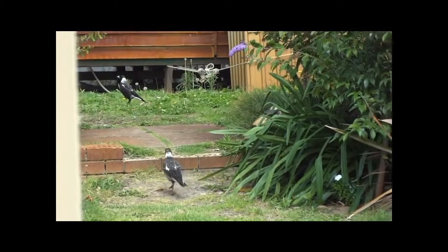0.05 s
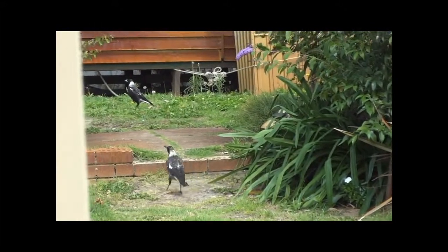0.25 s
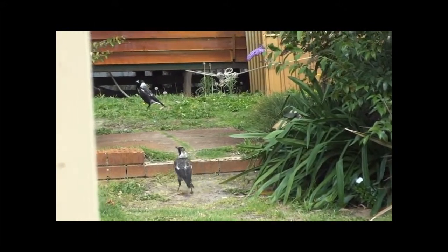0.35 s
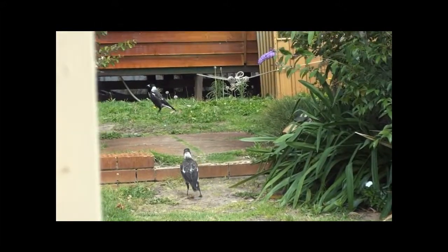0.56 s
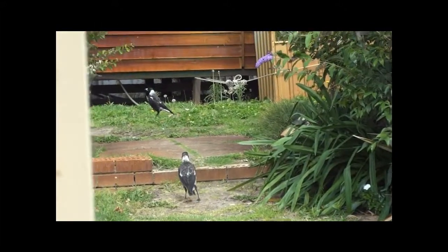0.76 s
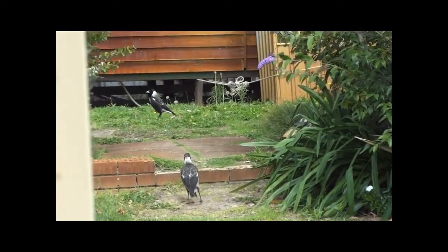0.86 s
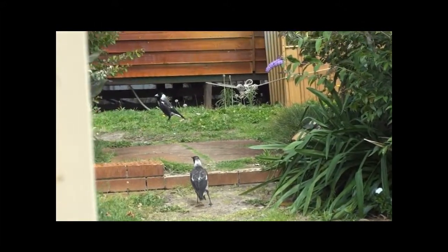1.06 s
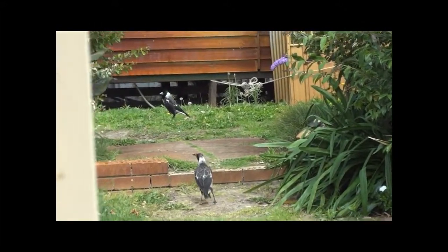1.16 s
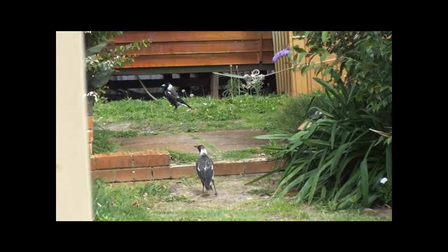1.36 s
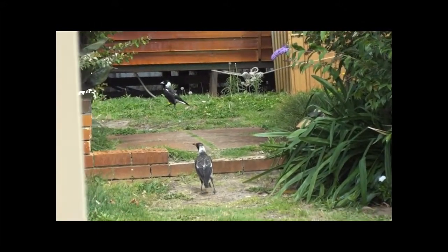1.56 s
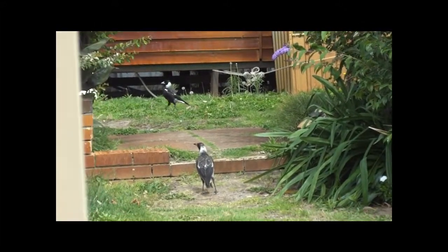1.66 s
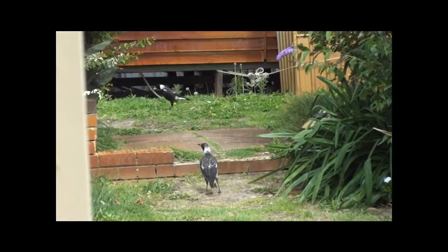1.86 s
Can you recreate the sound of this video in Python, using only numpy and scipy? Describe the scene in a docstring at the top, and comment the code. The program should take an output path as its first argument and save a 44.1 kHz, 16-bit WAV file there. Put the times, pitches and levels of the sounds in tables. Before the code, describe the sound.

Short burst of upswept bird pips echoing lightly between fences, with a soft distant engine throb beneath.

```python
"""Quick whistles in a backyard

A small bird pipes six quick rising whistles: harmonic sines with narrow breath noise on a pitch sweep.
Walls and fences throw them back as single echoes, with dense scatter and a decaying tail of taps.
Traffic washes below as shaped noise, and low tones beat as an engine far off.
Leaves tick in short bright noise bursts; another bird whistles faintly in gliding narrow noise."""
import sys
import numpy as np
from scipy import signal
from scipy.fft import rfft, irfft
from scipy.io import wavfile
from scipy.ndimage import uniform_filter1d

SR = 44100
rng = np.random.default_rng(int(sys.argv[2]) if len(sys.argv) > 2 else 0)


def how_loud(loudness_db):
    """Turn decibels into a plain amplitude multiplier (0 dB gives 1, 20 dB gives 10)."""
    steps = np.asarray(loudness_db, float) / 20
    return 10 ** steps


def generate_wav(sig):
    """Save sig (samples, or channels by samples) to the path in sys.argv[1] as 16-bit PCM at SR."""
    pcm = np.round(np.clip(np.atleast_2d(sig).T, -1, 1) * 32767).astype(np.int16)
    wavfile.write(sys.argv[1], SR, pcm)


N = 83790  # length [samples]


def unit_rms(x):
    """Scales a signal to an rms of 1."""
    return x / np.sqrt(np.mean(x ** 2) + 1e-20)


def read(points, hz):
    """Reads a curve over frequency, interpolating along log frequency."""
    f, value = np.transpose(points)
    return np.interp(np.log(hz + 1), np.log(f + 1), value)


def add(mix, start_s, sound):
    """Mixes a sound in at its start time; whatever overruns the end is cut."""
    part = mix[round(start_s * SR):][:len(sound)]
    part += sound[:len(part)]


def resonate(x, hz, width_hz):
    """A resonance of gain 1 that follows the curve hz: shift down to 0 Hz, smooth, shift back up."""
    turn = np.exp(2j * np.pi * np.cumsum(hz * np.ones(len(x))) / SR)
    r = np.exp(-np.pi * width_hz / SR)
    return 2 * (turn * signal.lfilter([1 - r], [1, -r], x / turn)).real


def narrow_noise(noise, hz, width_hz):
    """Noise through two equal resonances in a row, at an rms of 1."""
    return unit_rms(resonate(resonate(noise, hz, width_hz), hz, width_hz))


def wash():
    """Traffic and air: random short-time spectra with drifting patches and a treble hiss of its own level."""
    # colour of the wash, relative: (frequency [Hz], density [dB per Hz])
    colour = [(15, -26), (25, -19.5), (58, -6), (97, -8.5), (130, -17), (170, -10), (263, -17),
              (373, -18.5), (531, -18.5), (887, -18.5), (962, -20), (2760, -39), (6210, -52.5),
              (11600, -54.5), (16000, -61)]
    # stereo width: (frequency [Hz], left-right likeness [-1 to 1])
    likeness = [(30, .9999), (60, 1), (125, 0.97), (250, 0.92), (500, 0.71), (1000, 0.73), (3000, 0.43),
                (8000, 0.89), (14000, 1)]
    # rise and fall about the mean level: (time [s], level [dB])
    swell = [(0.0, -41.5), (0.344, -41.5), (0.428, -42), (1.856, -43.5), (1.9, -44)]
    # rise and fall of the treble hiss, relative: (time [s], level [dB])
    hiss = [(0, -0.5), (.5, 2), (.6, 3.5), (1.15, 6), (1.3, 6), (1.39, 6.5), (1.45, 8), (1.56, 5),
            (1.65, 3.5), (1.78, 7.5), (1.9, 9)]
    mean_db, patch_db = -42, 1.43  # patch_db is rms
    hiss_from_hz, hiss_full_hz = 3000, 7000
    size, hop = 2048, 512

    frames, hz = N // hop + 5, np.fft.rfftfreq(size, 1 / SR)
    a, b, c, d, patches = rng.standard_normal((frames, len(hz), 5)).T
    patches = uniform_filter1d(patches, size=20, axis=0)  # over frequency
    patches = unit_rms(uniform_filter1d(patches, size=8, axis=1))  # over time

    same = np.clip(read(likeness, hz), -1, 1)[:, None]
    left = a + 1j * b
    right = same * left + np.sqrt(1 - same ** 2) * (c + 1j * d)
    spectra = np.array([left, right]) * how_loud(read(colour, hz)[:, None] + patch_db * patches)

    hiss_share = np.clip((hz - hiss_from_hz) / (hiss_full_hz - hiss_from_hz), 0, 1)[:, None]
    spectra *= how_loud(hiss_share * np.interp(np.arange(frames) * hop / SR, *np.transpose(hiss)))
    noise = unit_rms(signal.istft(spectra, nperseg=size, noverlap=size - hop)[1][:, :N])
    level = np.interp(np.arange(N) / SR, *np.transpose(swell))
    return how_loud(mean_db + level - level.mean()) * noise


def engine():
    """Low tones of fixed pitch, each with its own level curve; the two lowest beat into a throb."""
    # rms of each tone, lowest first: (time [s], level [dB])
    low = [(0.0, -56), (0.084, -40.5), (0.178, -47), (0.344, -49), (0.512, -49), (0.776, -36), (1.026, -42),
           (1.136, -50), (1.37, -41.5), (1.798, -57), (1.9, -51)]
    mid = [(0.0, -48.5), (0.3, -37), (0.476, -37), (0.952, -46.5), (1.136, -47), (1.254, -63), (1.9, -51)]
    top = [(0.0, -56), (0.798, -51), (0.836, -49), (1.778, -52), (1.9, -49)]
    hum = [(0.0, -57), (0.02, -47.5), (0.284, -41.5), (0.438, -52), (0.486, -40), (0.544, -58.5),
           (0.936, -51.5), (1.068, -57.5), (1.122, -80), (1.9, -63)]
    high = [(0.0, -61), (0.21, -55.5), (0.254, -75), (0.312, -45.5), (0.39, -54), (1.39, -81), (1.412, -60),
            (1.9, -64)]
    crest_s = 0.72  # all tones crest together here

    t, out = np.arange(N) / SR, np.zeros(N)
    for hz, curve in zip((42.5, 54.5, 75.5, 169, 374), (low, mid, top, hum, high)):
        level = how_loud(np.interp(t, *np.transpose(curve)))
        out += np.sqrt(2) * level * np.cos(2 * np.pi * hz * (t - crest_s))
    return out


def leaves():
    """Short bright ticks: bands of noise with a fast attack and an exponential rustle behind."""
    # ticks: (start [s], level before attack and decay [dB], centre [Hz], t60 [s])
    ticks = [(.288, -63, 14000, 0.048), (1.063, -46.5, 10800, .05), (1.431, -52, 10400, 0.093),
             (1.786, -56, 10200, .12)]
    width_hz, attack_s = 3500, 0.0022

    out, t = np.zeros(N), np.arange(SR // 5) / SR
    noises = rng.standard_normal((len(ticks), len(t)))
    for (start, db, hz, t60), noise in zip(ticks, noises):
        envelope = how_loud(db - 60 * t / t60) * np.minimum(t / attack_s, 1)
        add(out, start, envelope * narrow_noise(noise, hz, width_hz))
    return out


def whistle(length, glide, first_hz, top_hz, db, root_db, over_db, chance):
    """Pitch sweeps up, faint and ragged, and levels off into a clear bright note that stops short."""
    # overtones: (multiple of the fundamental, level against the octave [dB])
    overtones = [(3, -36), (4, -23), (5, -24.5)]
    # windpipe and beak: (frequency [Hz], gain [dB])
    pipe = [(1800, -7), (2400, -7.5), (3000, -0.5), (3600, 4.5), (4500, -1), (5300, 0.5), (6200, -2.5),
            (8000, 10), (10000, 8.5), (12000, 3), (15500, -0.5)]
    onset_s, release_s = 0.005, 0.0039
    glide_bend, sag_hz_per_s, drop_hz_per_s = 1.5, 163, 63600
    wobble_share = 0.0045  # rms, share of the pitch
    flutter_db, sweep_flutter_db = 1.2, 5  # rms; the second grows with raggedness
    breath_db, sweep_breath_db, root_width_hz = -25, 17, 400
    swell_db, brighten_db = -13, -15.5  # start of the glide against its end: whole note, overtones

    t = np.arange(int((length + 5 * release_s) * SR)) / SR
    wobble, flutter = (unit_rms(uniform_filter1d(c, size=100))[:len(t)] for c in chance[:2])
    early = np.clip(1 - t / glide, 0, 1)  # 1 at the start, 0 once the glide is over
    after = np.maximum(t - length, 0)

    hz = top_hz - (top_hz - first_hz) * early ** glide_bend - sag_hz_per_s * t
    ragged = np.sqrt(np.clip(1 - hz / top_hz, 0, 1) * 2)
    hz = hz * (1 + wobble_share * wobble) - drop_hz_per_s * after  # the pitch collapses as the note dies
    hz = np.maximum(hz, first_hz / 2)
    phase = 2 * np.pi * np.cumsum(hz) / SR

    # (multiple, level [dB], extra breath [dB]): a cleaner fundamental, the octave, breathier overtones
    parts = [(1, root_db, -8), (2, 0.029, 0.0049)]
    parts += [(k, d + over_db + brighten_db * early, 11) for k, d in overtones]
    tone = 0
    for k, part_db, airy_db in parts:
        breath = narrow_noise(chance[2][:len(t)], k * hz, root_width_hz * np.sqrt(k))
        breath = how_loud(breath_db + airy_db + sweep_breath_db * ragged) * breath
        sine = np.sqrt(2) * np.sin(k * phase)
        tone = tone + how_loud(part_db + read(pipe, k * hz)) * (sine + breath)

    edges = np.minimum(t / onset_s, 1) * np.exp(-after / release_s)
    level_db = db + swell_db * early + (flutter_db + sweep_flutter_db * ragged) * flutter
    return how_loud(level_db) * edges * tone


def single_echoes():
    """Direct sound, then separate delayed copies; a negative gain flips the wave."""
    # first echoes: (delay [s], left gain [factor], right gain [factor])
    echoes = [(.0031, 0.8, 0.7), (.0072, -0.59, -0.43), (0.0106, 0.33, 0.33), (0.018, 0.22, 0.084),
              (.027, .3, .25), (0.043, 0.27, 0.17)]
    path = np.zeros((2, SR))
    path[:, 0] = 1
    for delay, left, right in echoes:
        path[:, round(delay * SR)] += left, right
    return path


def scattered_yard():
    """Sparse random taps: a slow-building tail whose bands die at their own speed, and near scatter."""
    # decay of the tail: (frequency [Hz], t60 [s])
    decay = [(2000, 0.42), (3500, 0.22), (6000, 0.27), (14000, 0.22)]
    tail_db, tail_rise_s, same = -7.5, 0.035, 0.91  # same: left-right likeness of the taps
    near_db, near_t60 = 1.5, 0.083  # dense scatter off the ground and leaves; t60 in s

    spacing = 20  # one tap per 20 samples
    at = np.arange(0, SR - spacing, spacing) + rng.integers(0, spacing, (2, SR // spacing - 1))
    taps = np.zeros((2, SR))
    np.put_along_axis(taps, at, rng.choice([-1., 1.], at.shape), 1)
    taps[1] = same * taps[0] + np.sqrt(1 - same ** 2) * taps[1]

    t = np.arange(SR) / SR
    hz, frame_s, spectra = signal.stft(taps, SR, nperseg=256)
    spectra = spectra * how_loud(-60 * frame_s / read(decay, hz)[:, None])
    tail = signal.istft(spectra, SR, nperseg=256)[1][:, :SR]
    tail = tail * (1 - np.exp(-(t / tail_rise_s) ** 2))
    near = taps * how_loud(-60 * t / near_t60)
    # levels are the energy of the left path
    tail = how_loud(tail_db) * tail / np.linalg.norm(tail[0])
    return tail + how_loud(near_db) * near / np.linalg.norm(near[0])


def bird():
    """Six whistles, straight and by single echoes, then scattered through the yard, a little to the left."""
    # whistles: (start [s], length before release [s], glide [s], first pitch [Hz], top pitch [Hz],
    # level [dB], fundamental [dB], overtones [dB])
    notes = [(0.654, 0.039, 0.021, 2424, 2919, -31, 0.5, 3), (0.728, 0.04, .032, 1810, 2970, -26.5, 1, 0.5),
             (0.803, 0.0421, 0.041, 1679, 3142, -24, -1.5, 2.5),
             (0.889, 0.0416, .034, 1828, 3026, -23, -3.5, -1),
             (.971, 0.04, .032, 1803, 2990, -27, -0.5, -1.5),
             (1.08, .030, .028, 1799, 2708, -37.5, 7, -0.5)]
    # the beak beams its top notes forward; lower ones arrive more by way of the yard:
    # (frequency [Hz], gain on the straight and single-echo path [dB])
    beam = [(1800, -8), (2500, -5), (2900, 0), (3300, 0), (3600, -8), (4800, -6), (5600, 0), (7000, 0),
            (10500, -4), (12000, 0)]
    pan_db = 0.4  # left over right

    song = np.zeros(N)
    chances = rng.standard_normal((len(notes), 3, SR // 10))  # noise for wobble, flutter and breath
    for (start, *settings), chance in zip(notes, chances):
        add(song, start, whistle(*settings, chance))
    beamed = irfft(rfft(song) * how_loud(read(beam, np.fft.rfftfreq(N, 1 / SR))), N)
    straight = signal.fftconvolve(beamed[None], single_echoes(), axes=1)[:, :N]
    scattered = signal.fftconvolve(song[None], scattered_yard(), axes=1)[:, :N]
    return (straight + scattered) * how_loud(np.array([[pan_db / 2], [-pan_db / 2]]))


def far_bird():
    """Thin wavering whistles from far away: narrow noise on a straight pitch glide, faded in and out."""
    # whistles: (start [s], length [s], first pitch [Hz], last pitch [Hz], level before the fades [dB])
    calls = [(1.46, .21, 4280, 4080, -71), (1.80, .16, 3000, 3800, -66)]
    width_hz = 200

    out = np.zeros(N)
    noises = rng.standard_normal((len(calls), SR // 2))
    for (start, length, first_hz, last_hz, db), noise in zip(calls, noises):
        u = np.linspace(0, 1, int(length * SR))
        hz = first_hz + (last_hz - first_hz) * u
        fades = np.sqrt(np.sin(np.pi * u).clip(0))
        add(out, start, how_loud(db) * narrow_noise(noise[:len(u)], hz, width_hz) * fades)
    return out


def scene():
    """All sources together."""
    return wash() + engine() + leaves() + bird() + far_bird()


def roll_off(x):
    """The treble ends steeply here."""
    return signal.sosfilt(signal.butter(12, 16730, fs=SR, output="sos"), x)


def record(dry):
    """Limits the band with a steep linear-phase low-pass at 15.9 kHz and finishes the mix."""
    edge = signal.firwin(511, 15900, window=("kaiser", 9), fs=SR)
    finished = signal.oaconvolve(dry, edge[None], "same")
    return roll_off(finished)


dry = scene()
out = record(dry)
generate_wav(out)
```